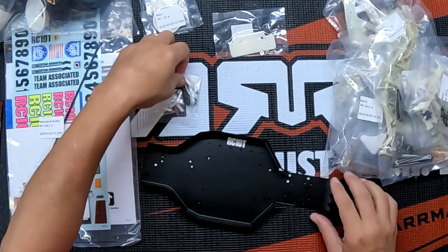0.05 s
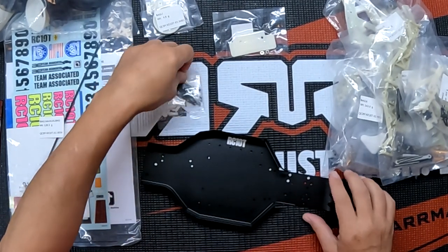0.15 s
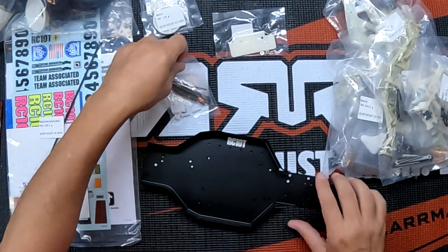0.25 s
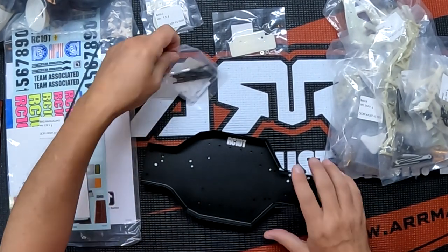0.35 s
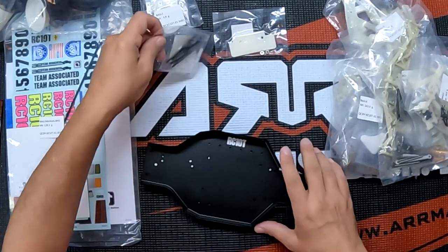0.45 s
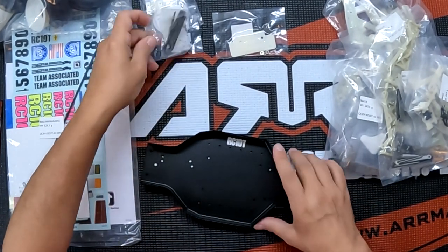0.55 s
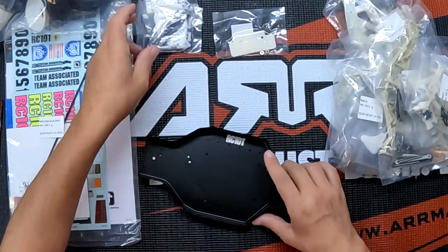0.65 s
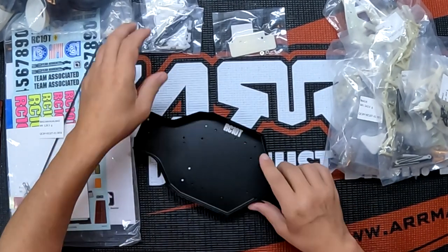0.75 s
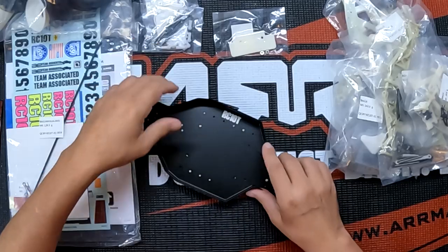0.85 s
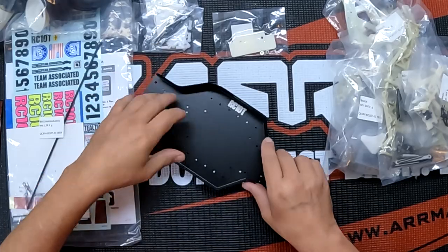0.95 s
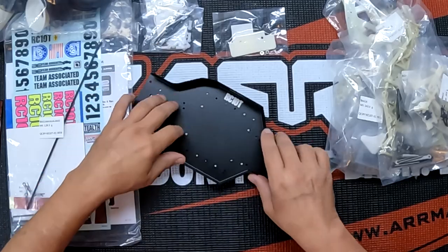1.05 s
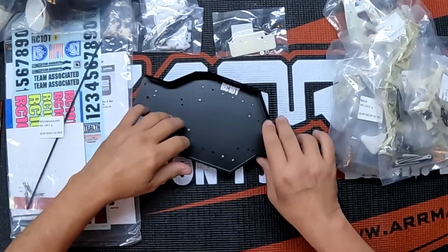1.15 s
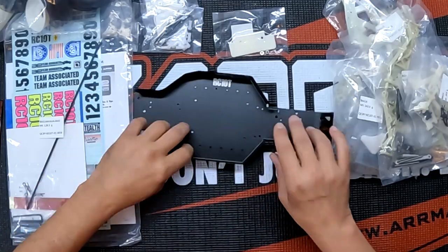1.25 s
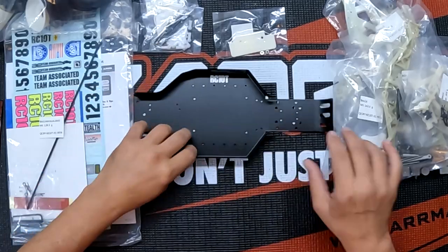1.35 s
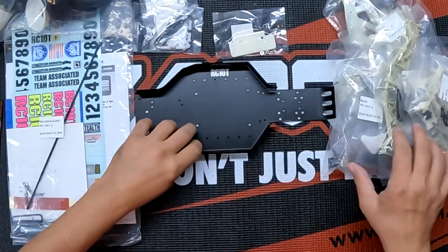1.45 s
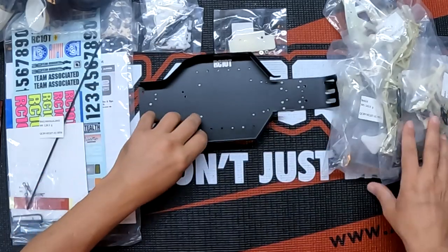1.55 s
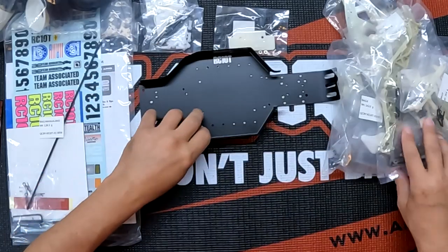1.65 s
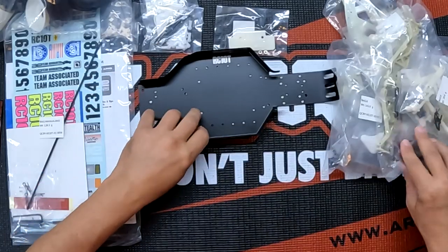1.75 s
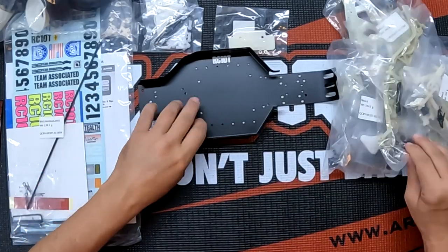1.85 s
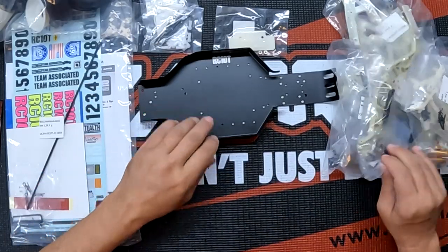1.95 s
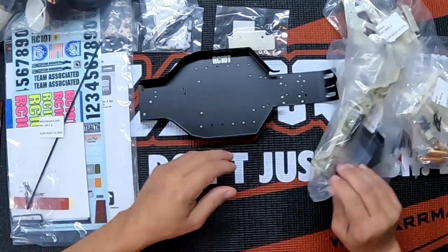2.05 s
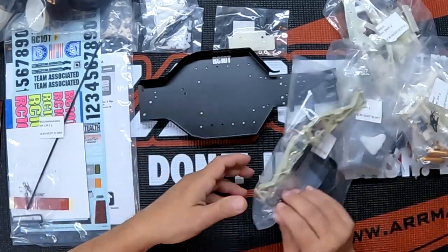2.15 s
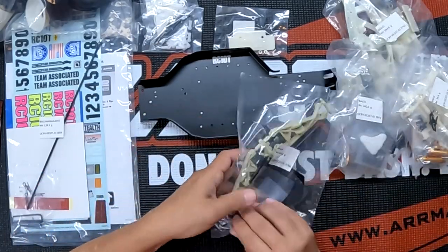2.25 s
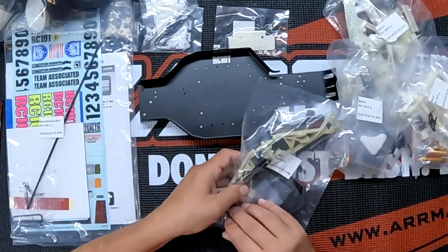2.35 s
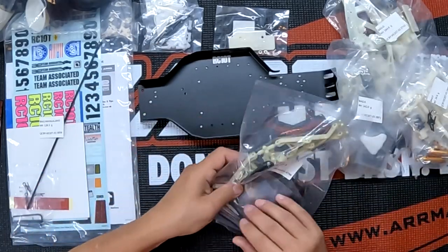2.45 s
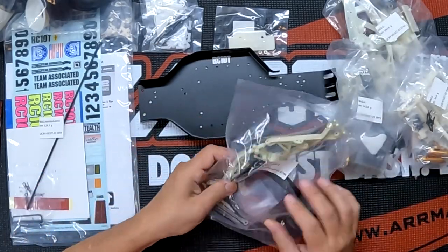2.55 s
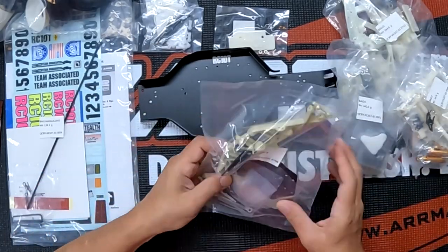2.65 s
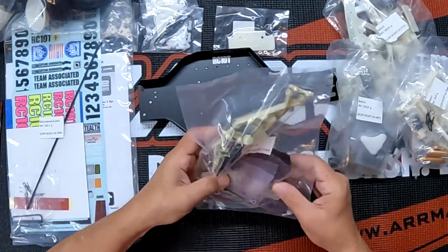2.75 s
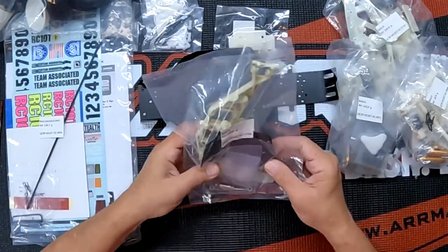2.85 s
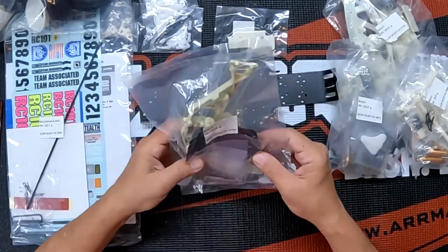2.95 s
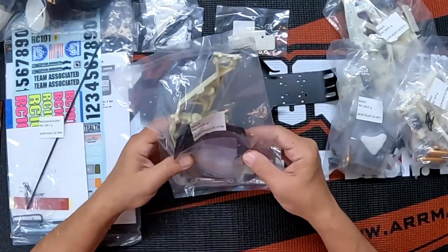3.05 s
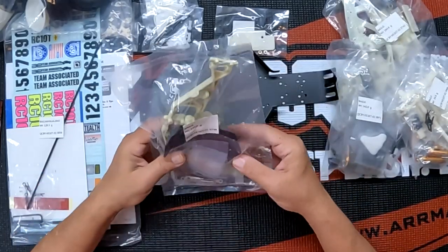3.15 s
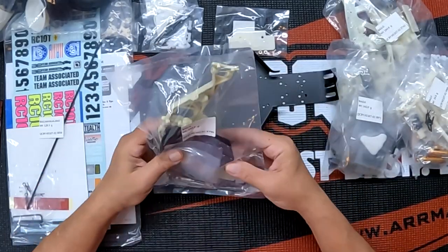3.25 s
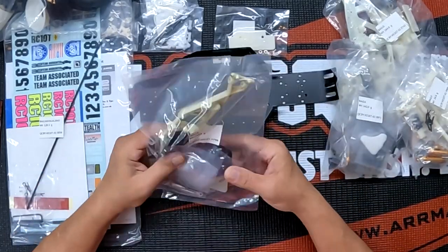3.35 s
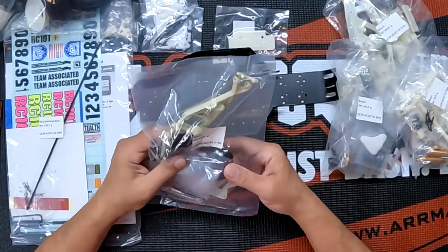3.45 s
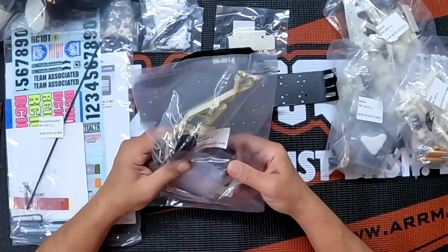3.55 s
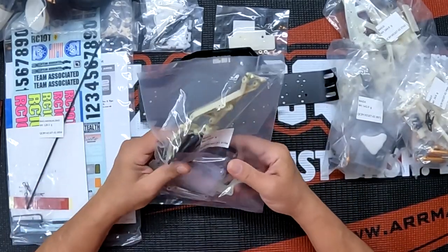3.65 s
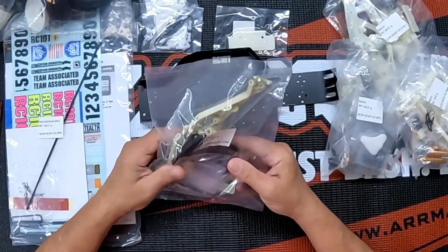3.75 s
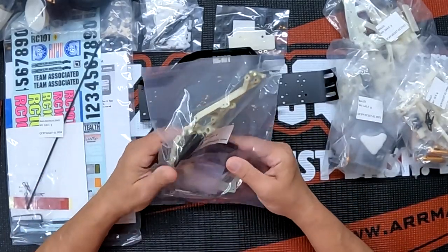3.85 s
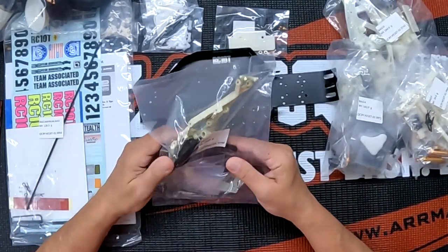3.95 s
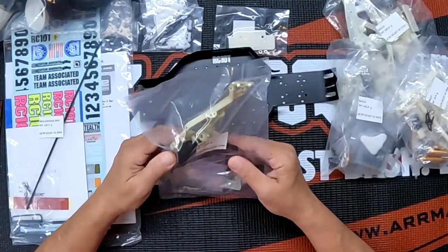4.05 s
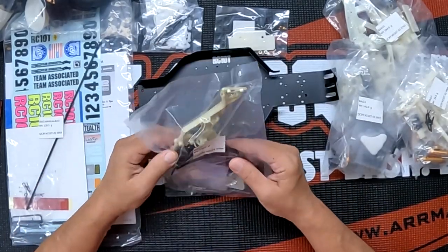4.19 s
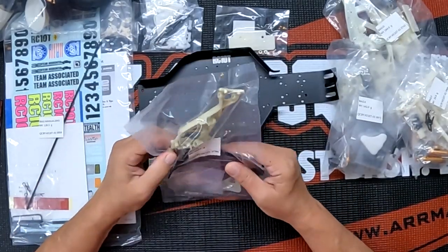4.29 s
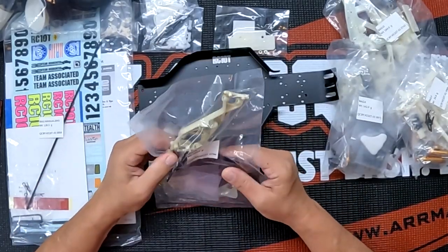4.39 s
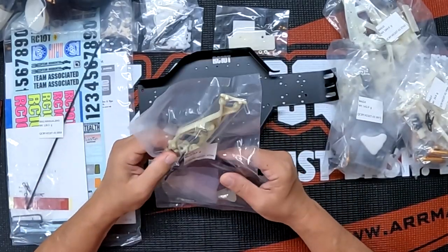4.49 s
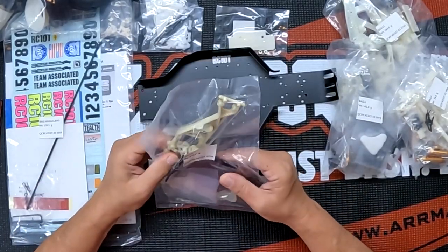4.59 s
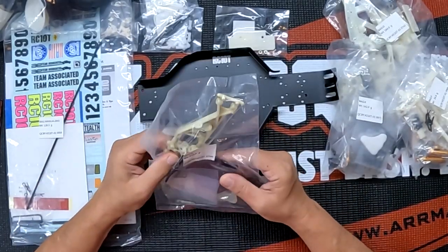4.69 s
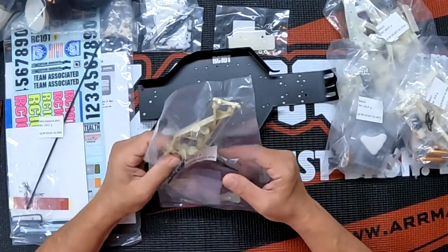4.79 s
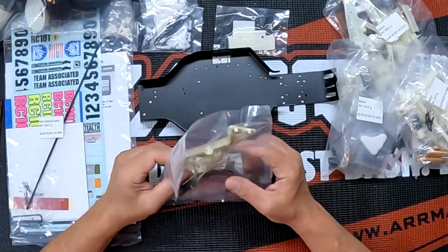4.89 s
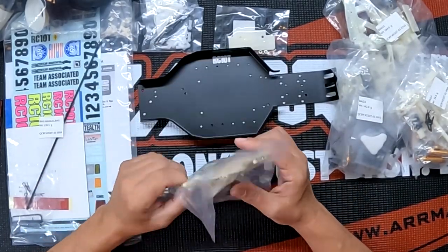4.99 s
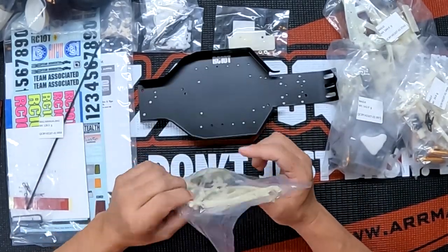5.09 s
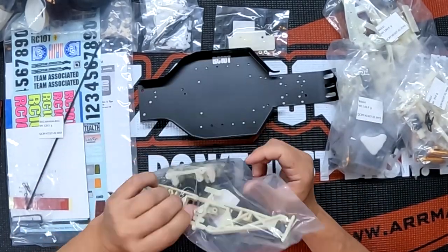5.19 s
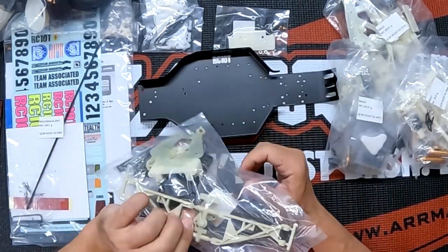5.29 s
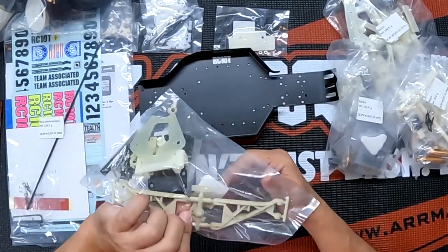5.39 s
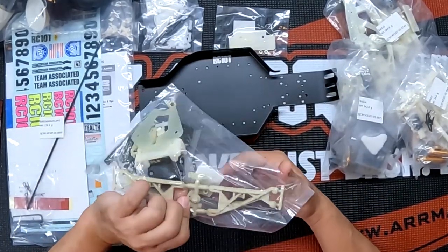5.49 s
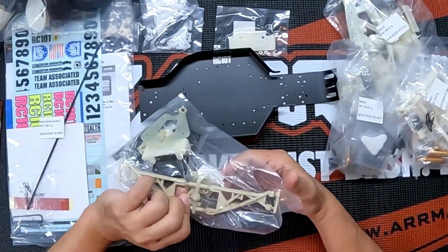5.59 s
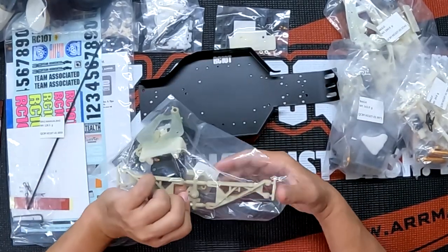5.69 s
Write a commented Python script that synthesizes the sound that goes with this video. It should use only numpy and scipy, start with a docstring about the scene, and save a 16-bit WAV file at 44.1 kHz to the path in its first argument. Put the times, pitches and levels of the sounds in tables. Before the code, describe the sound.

Thin plastic bags crinkle and snap at a padded bench, a plate slides briefly, and metal parts clink near the end over faint hum.

```python
"""A machine hums low over rumble, a slow tone and noise, in a small damped room throughout. Two hands put down
a small plastic zip bag: film rustles (ticking noise), creases snap (noise bursts), the padded bench thuds (damped
sines) and metal parts clink (decaying modes). A plate is turned, then slid straight on the mat. A large bag
is lifted, parts clinking inside, then examined among more snaps. Last it is flipped, with the most clinks."""
import sys
import numpy as np
from scipy import signal
from scipy.fft import rfft, irfft, next_fast_len
from scipy.io import wavfile
from scipy.ndimage import uniform_filter1d, map_coordinates

SR = 44100
rng = np.random.default_rng(int(sys.argv[2]) if len(sys.argv) > 2 else 0)


def waveform_to_disk(signal):
    """Save audio, clipped to [-1, 1], as 16-bit WAV at the path in sys.argv[1]."""
    frames = np.transpose(np.atleast_2d(signal))
    scaled = np.clip(frames, -1, 1) * 32767
    samples = np.round(scaled).astype(np.int16)
    wavfile.write(sys.argv[1], SR, samples)


N = 252693

# Machine hum. Each row: time in seconds, relative level in dB.
HUM_LEVEL = [(0.0, -51), (0.05, -50.5), (0.17, -46.5), (0.61, -51), (1.13, -43), (1.2, -52), (1.26, -43),
             (2.23, -51.5), (2.36, -46), (2.59, -57), (2.66, -45), (2.86, -51), (5.67, -50.5), (5.73, -48)]
# Room and bench rumble spectrum. Each row: frequency in Hz, density in dB per Hz.
RUMBLE_SPECTRUM = [(15, -7), (34, -5), (48, 5.5), (75, -13), (105, -3.5), (150, -10), (215, -13.5),
                   (260, -18.5), (400, -29.5), (800, -70)]
# Rumble in left and right. Each row: frequency in Hz, likeness from 0 to 1.
RUMBLE_LIKENESS = [(40, 0.93), (110, 0.74), (300, 0.65)]
# Handling, one list a gesture: small bag put down, plate turned, plate set straight, large bag lifted,
# examined, flipped. Each row: time in seconds, rustle level in dB, level of the body of large folds in dB.
GESTURES = [
    [(0, -50, -66), (.125, -60, -74), (.135, -47, -61.5), (.348, -49, -53), (.5, -47.5, -55.5),
     (.71, -49, -56), (.87, -46, -59)],
    [(.88, -46, -62), (.97, -51, -79), (1.118, -50.5, -97), (1.33, -59, -71)],
    [(1.345, -49.5, -52), (1.4, -49, -40), (1.512, -55.5, -56.5), (1.558, -61.5, -59), (1.7, -47.5, -54)],
    [(1.712, -56, -59), (1.752, -37, -46), (1.814, -44.5, -49), (1.896, -37.5, -42.5),
     (2.054, -42.5, -44.5), (2.206, -41, -42), (2.55, -38.5, -44), (2.708, -45.5, -47), (2.77, -55, -59.5),
     (2.996, -46.5, -49.5), (3.158, -56, -55.5), (3.33, -56, -62)],
    [(3.34, -48, -64), (3.41, -54, -59), (3.56, -47.5, -48.5), (3.8, -54.5, -53), (4.07, -43, -47),
     (4.44, -40.5, -42.5), (4.68, -48, -50), (4.95, -53.5, -59.5)],
    [(4.98, -50.5, -60), (5.12, -38, -40.5), (5.2, -43, -46.5), (5.46, -39.5, -41.5), (5.58, -48.5, -50),
     (5.73, -47, -47)],
]
# Film against plate. Each row: time in seconds, crispness (1 film crinkles, 0 plate slides on the mat).
CRISPNESS = [(0, 1), (.82, 1), (.9, .15), (1.62, .15), (1.7, 1), (5.73, 1)]
# Where the hands work. Each row: time in seconds, left over right in dB.
HANDS_PAN = [(0.0, 0), (1.6, -0.5), (1.72, -2.0), (2.65, -1), (5.51, 0), (5.73, -1.0)]
# Colours of crinkling film, of its large folds, of the sheen, of the plate sliding on the mat, and of the body
# of that scuff. Each row: frequency in Hz, density in dB per Hz.
FILM_SPECTRUM = [(300, -35), (900, -11), (1600, -3.5), (3000, -4), (5300, -6), (7600, -13), (8300, -50),
                 (11000, -82)]
FOLDS_SPECTRUM = [(120, -14), (300, -2), (600, -3), (950, 3), (1300, -0.5), (2000, -36)]
SHEEN_SPECTRUM = [(6000, -7), (8000, 0), (10500, -4), (13000, -11), (14200, -19.5), (15000, -57),
                  (15700, -50)]
SLIDE_SPECTRUM = [(900, -22), (1500, -7.5), (2350, -2.5), (3100, -7), (5500, -9), (7600, -12), (8300, -34),
                  (11000, -68)]
SCUFF_SPECTRUM = [(300, -15), (600, -5.5), (950, 0), (1500, -4), (2200, -35.5)]
# Film noise in left and right. Each row: frequency in Hz, likeness from 0 to 1.
FILM_LIKENESS = [(60, .9), (250, .94), (1000, .9), (3000, .87), (7000, .66), (12000, .4)]
# Buckling creases, and at 5.405 the noisy click of a metal knock. Each row: onset in seconds,
# relative level in dB, panel pitch in Hz, body relative to level in dB, sharpness in dB.
SNAP_EVENTS = [(0.008, -29, 2600, -42, -9), (0.038, -28.5, 3340, -47, -11), (0.133, -28.5, 2680, -25, -20),
               (0.249, -32, 3200, -23, -16), (0.267, -21, 2750, -11, -15), (0.294, -27.5, 1020, -10, -15),
               (0.402, -27, 1940, -18, -26), (0.41, -14.5, 4100, -29, -13), (0.501, -29, 2420, -21, -20),
               (0.53, -30, 1900, -31, -17), (0.55, -27.5, 2330, -28, -10), (0.587, -31, 1920, -29, -28),
               (0.644, -25.5, 1690, -23, -21), (0.685, -28, 2920, -17, -21), (0.698, -29, 1760, -18, -17),
               (0.776, -28, 1350, -10, -29), (0.809, -22, 1770, -23, -11), (1.092, -30.5, 2320, -33, -6),
               (1.528, -30.5, 2230, -15, -16), (1.687, -26.5, 4620, -12, -27),
               (1.713, -18.5, 960, -11, -27), (1.736, -17.5, 1630, -23, -25),
               (1.744, -14, 1610, -20, -17.5), (1.75, -17.5, 942, -11, -38), (1.764, -22, 940, -15, -26),
               (1.792, -29, 1420, -18, -28), (1.809, -33, 912, 0, -19), (1.848, -22, 1000, -17, -4),
               (1.863, -19.5, 899, -17, -19), (1.905, -16.5, 1580, -14, -19),
               (1.951, -21.5, 3340, -28, -12), (2.019, -25.5, 1250, -8, -37), (2.033, -16, 2200, -10, -51),
               (2.047, -26, 910, -8, -33), (2.061, -21, 902, -14, -29), (2.1, -25, 1410, -14, -30),
               (2.126, -19, 1370, -13, -22), (2.143, -21.5, 910, -10, -11), (2.181, -27, 1040, -12, -31),
               (2.196, -18, 1500, -11, -35), (2.218, -24, 993, -11, -24), (2.291, -16, 950, -9.5, -41),
               (2.315, -19.5, 1490, -17, -20), (2.376, -31, 4300, -24, -16), (2.39, -24, 4050, -31, -2),
               (2.402, -22, 4530, -19, -12), (2.422, -17, 1480, -22, -33), (2.429, -11, 4320, -24, -32),
               (2.441, -8.5, 4410, -22, -22), (2.48, -26, 4090, -13, -22), (2.518, -16.5, 1380, -22, -29),
               (2.533, -14.5, 3330, -19, -22), (2.54, -16.5, 4150, -17, -13),
               (2.581, -26.5, 2150, -10, -18), (2.605, -18.5, 1150, -12, -38), (2.62, -22, 1070, -9, -39),
               (2.642, -21.5, 1090, -18, -21), (2.649, -22.5, 2030, -20, -25), (2.672, -21, 1300, -21, -15),
               (2.741, -21, 953, -10.5, -27), (2.784, -23, 3500, -10, -20), (2.836, -33, 2690, -17, -20),
               (2.869, -26, 2650, -20, -20), (2.934, -24, 2000, -17, -28), (2.946, -11.5, 3800, -17, -25.5),
               (2.981, -19.5, 1140, -11.5, -18), (3.005, -24, 4600, -20, -17),
               (3.012, -20.5, 1930, -27, -22), (3.025, -18.5, 3350, -28, -9), (3.04, -23, 3650, -24, -13),
               (3.073, -22, 5110, -22, -18), (3.09, -24.5, 956, -28, -10), (3.149, -22.5, 3320, -18.5, -19),
               (3.204, -23.5, 1740, -37, -27), (3.325, -26.5, 950, -11, -18), (3.35, -18.5, 1500, -20, -27),
               (3.373, -25.5, 960, -4, -20), (3.404, -23, 910, -18, -17), (3.462, -15.5, 2170, -24, -21),
               (3.497, -22.5, 1790, -12, -15), (3.534, -20, 1660, -26, -26), (3.593, -28, 2870, -16, -22),
               (3.613, -21, 1030, -14.5, -17), (3.652, -23, 1330, -15, -21), (3.676, -23.5, 1210, -15, -26),
               (3.73, -16.5, 1650, -34, -14), (3.734, -21, 1740, -23, -18), (3.748, -15, 3630, -20, -21),
               (3.774, -18, 1130, -23, -10), (3.8, -26, 1210, -8, -16), (3.88, -26, 3880, -28, -33),
               (3.901, -26.5, 1240, -28, -15), (3.938, -23, 1720, -30, -17), (3.963, -18.5, 1310, -18, -18),
               (3.975, -23, 2560, -25, -3), (3.997, -21, 4050, -31, -14), (4.015, -28, 4790, -11, -2),
               (4.045, -22.5, 990, -23, -25), (4.075, -20, 1240, -12, -22), (4.116, -26, 2000, -16, -23),
               (4.173, -27, 915, -9, -25), (4.232, -20.5, 2750, -25, -20), (4.248, -22, 2830, -30, -16),
               (4.289, -22.5, 1870, -19, -12), (4.331, -21, 1180, -30, -21), (4.345, -25.5, 2580, -27, -12),
               (4.363, -25, 3060, -33, -29), (4.435, -14.5, 2340, -32, -23),
               (4.454, -14.5, 1380, -9.5, -20), (4.467, -18, 970, -12.5, -6), (4.494, -17, 930, -17, -20),
               (4.561, -18.5, 3170, -25, -9), (4.591, -21.5, 3690, -26, -23),
               (4.701, -25.5, 1020, -22, -11), (4.741, -21.5, 1770, -15.5, -9),
               (4.757, -22.5, 977, -15, -9), (4.876, -22, 1780, -21, -18.5), (4.943, -29.5, 1840, -36, -23),
               (4.961, -18.5, 4560, -22, -20), (4.976, -17, 3600, -19, -9),
               (5.015, -22.5, 2450, -14.5, -14), (5.041, -18, 3250, -21, -24),
               (5.101, -18.5, 3960, -26, -2), (5.126, -26, 1700, -17, -26), (5.179, -27, 2990, -20, -11),
               (5.19, -21.5, 3530, -20, -9), (5.271, -20.5, 5310, -21, -23), (5.349, -20.5, 3560, -18, -21),
               (5.373, -15, 2440, -16, -13), (5.405, -15, 5230, -34, -3), (5.511, -21, 5300, -15, -33),
               (5.522, -22, 2790, -8.5, -21), (5.59, -22.5, 2000, -13.5, -21), (5.607, -24, 2030, -21, -29),
               (5.649, -27.5, 1550, -10, -37)]
# Soft thuds on the bench. Each row: start in seconds, relative level in dB, pitch in Hz, t60 in seconds.
BENCH_THUDS = [(0.187, -21.5, 93, 0.064), (0.801, -40.5, 195, 0.12), (1.19, -37.5, 94.5, 0.46),
               (1.332, -23, 91, 0.06), (1.531, -20.5, 93, 0.089), (1.929, -35.5, 114, 0.14),
               (2.2, -33, 176, 0.075), (2.8, -35, 115, 0.1), (2.94, -39, 130, 0.072),
               (4.448, -29, 258, 0.04), (5.0, -35, 120, 0.085)]
# Modes of the metal parts by family, keyed by about the lowest in kHz. Each row: frequency in Hz, level in dB.
METAL_MODES = {"2.3": [(2300, -1.5)], "3.5": [(3550, -2), (8350, -11)], "4.1": [(4072, -4), (4330, -16),
               (8690, -25)], "5.2": [(5235, -4.5), (5310, -7), (10870, -23), (13000, -35)],
               "6.6": [(6565, -0.5), (6620, -10), (8690, -10.5)]}
# Knocks of metal parts. Each row: start in seconds, relative level in dB, mode family woken,
# t60 of its lowest mode in seconds.
METAL_KNOCKS = [(.455, -31, "3.5", .05), (.47, -33.5, "3.5", .09), (2.430, -11, "4.1", .053),
                (2.430, -12.5, "5.2", 0.036), (2.471, -25, "4.1", .06), (2.948, -8, "4.1", 0.015),
                (5.272, -32.5, "2.3", 0.06), (5.273, -22.5, "4.1", 0.058), (5.271, -22, "5.2", 0.044),
                (5.379, -27, "2.3", 0.13), (5.386, -24, "5.2", 0.06), (5.386, -28, "6.6", 0.079),
                (5.404, -1, "5.2", 0.022), (5.404, -19, "6.6", 0.028), (5.413, -22, "5.2", 0.19),
                (5.424, -27, "2.3", 0.26), (5.424, -15, "4.1", 0.12), (5.423, -19.5, "5.2", 0.14),
                (5.424, -27.5, "6.6", 0.11), (5.442, -25, "5.2", 0.064), (5.459, -24, "5.2", 0.2),
                (5.47, -32, "5.2", .35), (5.460, -39, "6.6", 0.24)]
# Room decay. Each row: frequency in Hz, t60 in seconds.
ROOM_T60 = [(200, 0.084), (2000, 0.34), (10000, 0.18)]
# Colour difference of the channels. Each row: frequency in Hz, left over right in dB.
CHANNEL_TILT = [(300, -0.5), (3000, 0.5), (6000, 1), (9000, 3.5), (14000, 2)]

HUM_HZ = 58.8
RUMBLE_DB = -53.5  # at rest
SHAKE_DB, SHAKE_T60_S = -15.5, 0.29  # each thud shakes the bench: level re thud, decay
SHEEN_CRISP_DB, SHEEN_SLIDING_DB = -14.5, -8  # re rustle; the first holds at a rustle of -46 dB
SHEEN_GROWTH_DB_PER_DB = 0.084  # harder handling is brighter
HISS_DB = -76  # steady treble
SMALL_PER_S, SMALL_DB, SMALL_SCATTER_DB = 24, 11.5, -0.5  # lesser creases: rate, level re rustle, scatter
PANEL_HZ, PANEL_SCATTER_OCTAVES = 2000, 0.57
BODY_DB, BODY_DB_PER_OCTAVE = -16.5, -6  # lower panels are larger folds
SHARP_DB, COLOUR_SCATTER_DB = -20.5, 4
SNAP_SHEEN_DB, SHEEN_PER_SHARPNESS = -4, 0.71
SNAP_PAN_DB, SNAP_PAN_SCATTER_DB = -0.5, 1  # re the hands
BUCKLE_S = .001  # onset to crack
MODE_DAMPING_POWER = 0.88  # t60 falls with mode frequency to this power
LEFT_LAG_S, TOP_HZ = 1.5e-5, 15650


def amp(db):
    """Gain of a level in dB."""
    return 10 ** (np.asarray(db) / 20)


def unit(x):
    """Scaled to rms 1."""
    return x / np.sqrt(np.mean(x ** 2) + 1e-20)


def along(points, hz):
    """Table of (Hz, value) interpolated on a log axis."""
    f, v = np.transpose(points)
    return np.interp(np.log(hz + 1), np.log(f + 1), v)


def curves(rows):
    """One value per sample for each column after the time."""
    s, *cols = np.transpose(rows)
    return [np.interp(np.arange(N) / SR, s, c) for c in cols]


def wobble(knots_per_s, count=N):
    """A smooth random curve."""
    knots = rng.standard_normal(int(count * knots_per_s / SR) + 4)
    return map_coordinates(knots, [np.arange(count) * knots_per_s / SR])


def filtered(x, response):
    """x times a response of frequency."""
    m = next_fast_len(N + 8192)
    return irfft(rfft(x, m) * response(np.fft.rfftfreq(m, 1 / SR)), m)[..., :N]


def mix_angle(likeness, hz):
    """Mid-side angle that gives left and right the tabled likeness."""
    return np.arccos(np.clip(along(likeness, hz), -1, 1)) / 2


def spread(pair, spectrum, likeness):
    """Two unrelated signals coloured and mixed to left and right with the given likeness, rms 1."""
    def response(hz):
        angle = mix_angle(likeness, hz)
        return amp(along(spectrum, hz)) * [np.cos(angle), np.sin(angle)]
    mid, side = filtered(pair, response)
    return unit(np.array([mid + side, mid - side]))


def sides(pan_db):
    """Left and right gains."""
    return amp(np.array([pan_db, -pan_db]) / 2)


def place(rows, times_s):
    """Sum short sounds (channels, events, samples) at their times."""
    starts = np.round(np.asarray(times_s) * SR).astype(int)
    at = (starts[:, None] + np.arange(rows.shape[-1])).ravel()
    return np.array([np.bincount(at, r.ravel(), N + SR)[:N] for r in rows])


def hum():
    """A slightly unsteady low tone over rumble of room and bench, which swells with each thud."""
    level_db, = curves(HUM_LEVEL)
    turns = np.cumsum(HUM_HZ + 2.6 * wobble(16)) / SR
    phase = np.outer([1, -1], 0.18 * wobble(9.2))  # drifts oppositely in left and right
    tone = amp(level_db + 3.0 + .9 * wobble(12)) * np.sin(2 * np.pi * turns + phase)
    thud_s, thud_db = np.transpose(BENCH_THUDS)[:2, :, None]
    t = np.arange(SR // 2) / SR
    swells = amp(thud_db + SHAKE_DB - 60 * t / SHAKE_T60_S) * (1 - np.exp(-t / 0.031))
    shake = place(swells[None], thud_s[:, 0])
    rumble = spread(rng.standard_normal((2, N)), RUMBLE_SPECTRUM, RUMBLE_LIKENESS)
    return tone + (amp(RUMBLE_DB + 2.9 * wobble(2.7)) + shake) * rumble


def ticking(per_s, scatter_db, t60_s, hiss_db):
    """An envelope of many tiny buckles of very uneven size over sliding hiss."""
    sizes = (rng.random(N) < per_s / SR) * amp(scatter_db * rng.standard_normal(N))
    ticks = signal.lfilter([1], [1, -amp(-60 / (t60_s * SR))], uniform_filter1d(sizes, size=40))
    return np.sqrt(unit(ticks) ** 2 + amp(hiss_db) ** 2)


def patchy_noise(depth_db=2.5):
    """Noise pair whose colour keeps changing, as panels of other sizes move."""
    z = signal.stft(rng.standard_normal((2, N)), nperseg=256)[2]
    field = uniform_filter1d(rng.standard_normal(z.shape[1:]), size=5, axis=0)  # over frequency
    field = uniform_filter1d(field, size=4, axis=1)  # over time
    return signal.istft(z * amp(depth_db * unit(field)), nperseg=256)[1][:, :N]


def rustle():
    """Film slides and ticks, or a plate scuffs; large folds add a duller body, small ones a sheen."""
    film_db, folds_db = curves(np.concatenate(GESTURES))
    pan_db, = curves(HANDS_PAN)
    crisp, = curves(CRISPNESS)
    smooth = np.sqrt(1 - crisp ** 2)
    fine = ticking(per_s=170, scatter_db=5, t60_s=0.0049, hiss_db=2.5)
    fine = (fine * amp(2.57 * wobble(24.856))) ** crisp
    coarse = ticking(per_s=230, scatter_db=8.5, t60_s=0.088, hiss_db=-2.5) ** crisp * np.sqrt(fine)

    film = crisp * spread(patchy_noise() * fine, FILM_SPECTRUM, FILM_LIKENESS)
    film += smooth * spread(patchy_noise(), SLIDE_SPECTRUM, FILM_LIKENESS)
    folds = crisp * spread(patchy_noise() * coarse, FOLDS_SPECTRUM, FILM_LIKENESS)
    folds += smooth * spread(patchy_noise(), SCUFF_SPECTRUM, FILM_LIKENESS)
    crisp_sheen_db = SHEEN_CRISP_DB + SHEEN_GROWTH_DB_PER_DB * (film_db + 46)
    sheen_db = film_db + crisp * crisp_sheen_db + (1 - crisp) * SHEEN_SLIDING_DB
    sheen = spread(patchy_noise() * fine, SHEEN_SPECTRUM, FILM_LIKENESS)
    hiss = amp(HISS_DB) * spread(patchy_noise(), SHEEN_SPECTRUM, FILM_LIKENESS)
    handled = amp(film_db) * film + amp(folds_db) * folds + amp(sheen_db) * sheen
    return handled * sides(pan_db) + hiss


def small_snaps(count):
    """Lesser creases buckle at random, their level following the handling; rows as in SNAP_EVENTS."""
    s = rng.random(count) * (N / SR - .1) + .01
    size, octaves, body, sharp = rng.standard_normal((count, 4)).T
    at = (s * SR).astype(int)
    rustle_db = curves(np.concatenate(GESTURES))[0][at]
    crisp = curves(CRISPNESS)[0][at]
    db = rustle_db + SMALL_DB + SMALL_SCATTER_DB * size + 20 * np.log10(crisp)
    octaves = PANEL_SCATTER_OCTAVES * octaves
    body_db = BODY_DB + BODY_DB_PER_OCTAVE * octaves + COLOUR_SCATTER_DB * body
    return np.transpose([s, db, PANEL_HZ * 2 ** octaves, body_db, SHARP_DB + COLOUR_SCATTER_DB * sharp])


def snaps():
    """A crease creaks in, cracks, rings at its panel's pitch, then a faint noise tail of room echo dies away."""
    events = np.concatenate([SNAP_EVENTS, small_snaps(count=int(SMALL_PER_S * N / SR))])
    s, db, panel_hz, body_db, sharp_db = events.T[..., None]
    sheen_db = SNAP_SHEEN_DB + SHEEN_PER_SHARPNESS * sharp_db
    pan_db = curves(HANDS_PAN)[0][(s * SR).astype(int)]
    pan_db = pan_db + SNAP_PAN_DB + SNAP_PAN_SCATTER_DB * rng.standard_normal(s.shape)

    lead_s = .006  # room for the creak before the crack
    t, hz = np.arange(4096) / SR - lead_s, np.fft.rfftfreq(4096, 1 / SR)
    angle = mix_angle(FILM_LIKENESS, hz)
    mid, side = rfft(rng.standard_normal((len(s), 2, 4096))).transpose(1, 0, 2)
    mid, side = np.cos(angle) * mid, np.sin(angle) * side
    white = np.array([mid + side, mid - side])
    after = np.maximum(t, 0)
    creak = np.exp(np.minimum(t, 0) / 0.00063)
    crack = amp(-8.0 - 60 * after / 0.0046)
    echo_tail = amp(-22 - 60 * after / 0.18)

    def burst(colour, peak_db, t60_s, resonance=1):
        ringing = irfft(white * colour * resonance) * (amp(-60 * after / t60_s) + crack)
        x = (ringing + irfft(white * colour) * echo_tail) * creak
        return x / np.abs(x).max(axis=-1).mean(axis=0)[:, None] * amp(peak_db)

    detuning = (hz ** 2 - panel_hz ** 2) / (hz * panel_hz * 0.083 + 1)
    panel = 0.22 + 1 / np.sqrt(1 + detuning ** 2)
    # sharpness tilts the colour above 3.2 kHz
    edge = amp((sharp_db + 17.5) * np.clip(np.log2(hz / 3200 + 1e-9) / 1.97, 0, 1))
    rows = burst(edge * amp(along(FILM_SPECTRUM, hz)), db - 2.0, t60_s=0.018, resonance=panel)
    rows += burst(amp(along(FOLDS_SPECTRUM, hz)), db + body_db - 1.5, t60_s=0.087)
    rows += burst(amp(along(SHEEN_SPECTRUM, hz)), db + sheen_db + 0.5, t60_s=0.008)
    return place(rows * sides(pan_db), s[:, 0] + BUCKLE_S - lead_s)


def thuds():
    """A soft push on the padded top: a low damped swing."""
    s, db, hz, t60_s = np.transpose(BENCH_THUDS)[..., None]
    t = np.arange(SR // 3) / SR
    rows = amp(db - 60 * t / t60_s) * np.sin(2 * np.pi * hz * t) * (1 - np.exp(-t / 0.014))
    return place(rows[None], s[:, 0]) * sides(-1.7)[:, None]


def clinks():
    """Metal parts knock together; each knock wakes a family of modes, and loose contact shakes the ring."""
    t = np.arange(SR // 3) / SR
    rows = []
    for _, db, family, t60_s in METAL_KNOCKS:
        lowest_hz = METAL_MODES[family][0][0]
        ring = 0
        for hz, mode_db in METAL_MODES[family]:
            decay_db = 60 * t / t60_s * (hz / lowest_hz) ** MODE_DAMPING_POWER
            level = amp(db + mode_db + 1.6 * wobble(112, count=len(t)) - decay_db)
            ring = ring + level * np.sin(2 * np.pi * (hz * t + rng.random()))
        rows.append(ring * (1 - np.exp(-t / 0.00085)))
    return place(np.array(rows)[None], [knock[0] for knock in METAL_KNOCKS]) * sides(.4)[:, None]


def room(x):
    """Each frequency of the room's answer dies at its own speed; near surfaces reach both channels alike."""
    hz, t, z = signal.stft(rng.standard_normal((2, SR // 3)), SR, nperseg=256)
    decay = amp(-60 * t / along(ROOM_T60, hz)[:, None])
    both, apart = signal.istft(z * decay, SR, nperseg=256)[1]
    tail = np.array([both + 0.59 * apart, both - 0.46 * apart])
    delayed = np.pad(x, (200, 0))  # samples
    return signal.fftconvolve(delayed[None], tail / np.linalg.norm(tail[0]), axes=1)[:, :N]


def scene():
    """Hum, bags, bench and parts, with the echo of snaps and clinks."""
    film, metal = snaps(), clinks()
    echo = room((amp(-8.5) * film + amp(-13.0) * metal).mean(axis=0))
    return hum() + rustle() + film + thuds() + metal + echo


def record(dry):
    """The left channel hears slightly late and a little brighter; nothing is kept above the band limit."""
    half = np.array([[1], [-1]]) / 2  # left, right

    def response(hz):
        lag = np.exp(-2j * np.pi * hz * half * LEFT_LAG_S)
        return amp(half * along(CHANNEL_TILT, hz)) * lag * (hz < TOP_HZ)
    return filtered(dry, response)


dry = scene()
out = record(dry)
waveform_to_disk(out)
```